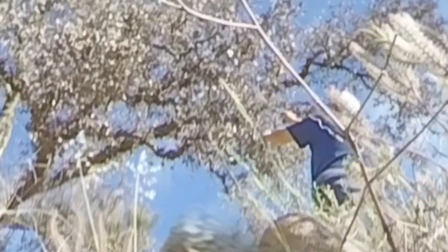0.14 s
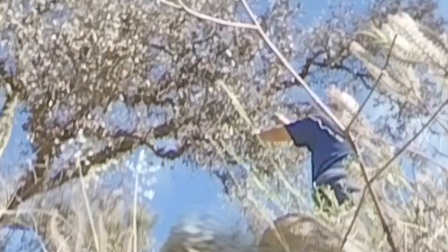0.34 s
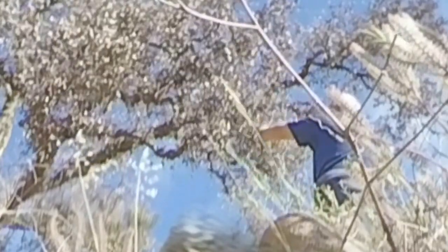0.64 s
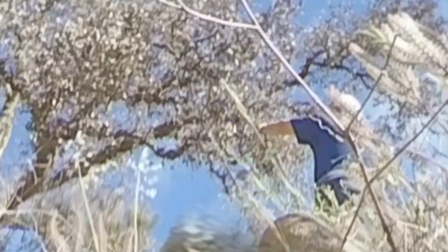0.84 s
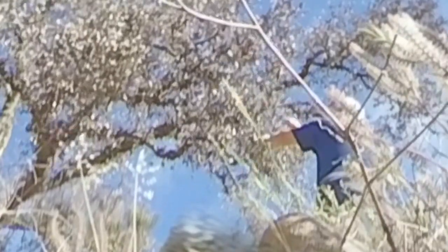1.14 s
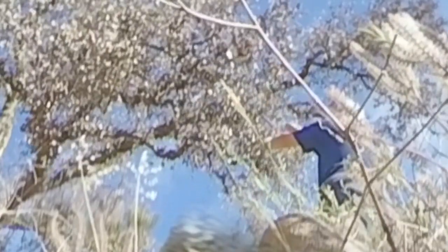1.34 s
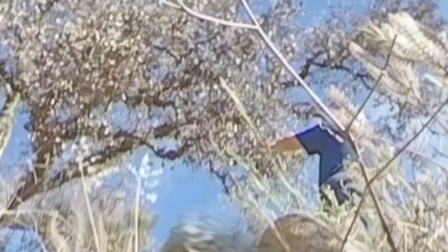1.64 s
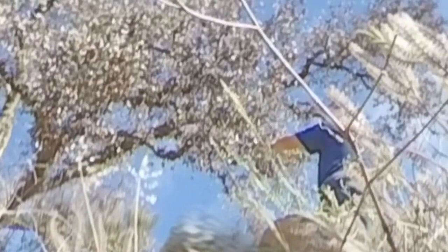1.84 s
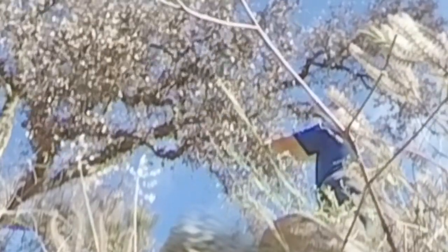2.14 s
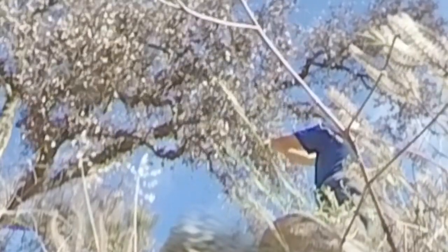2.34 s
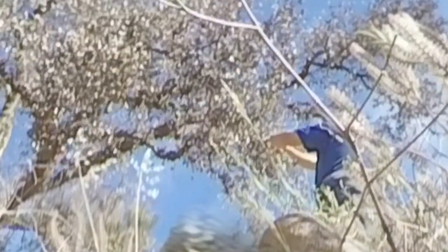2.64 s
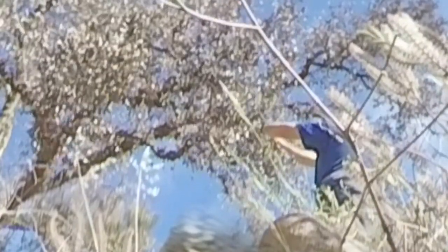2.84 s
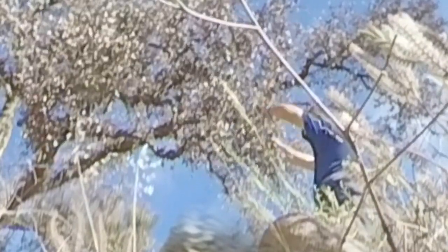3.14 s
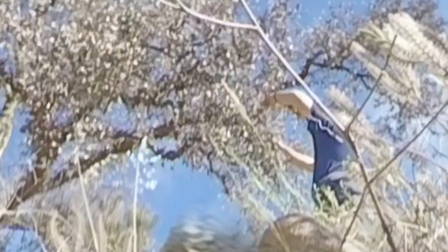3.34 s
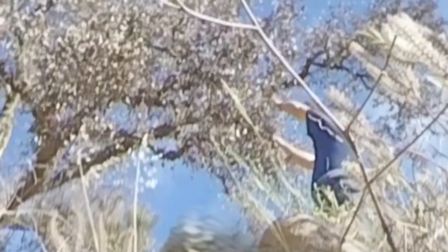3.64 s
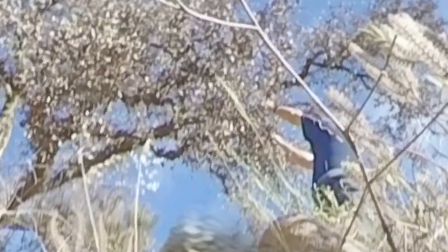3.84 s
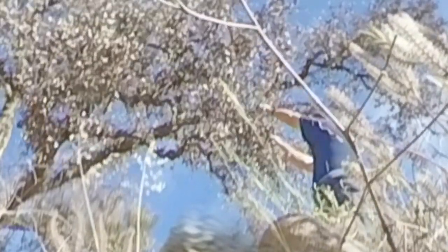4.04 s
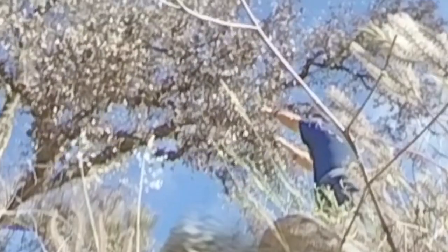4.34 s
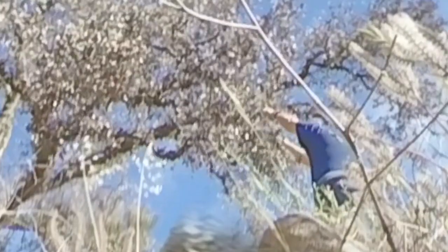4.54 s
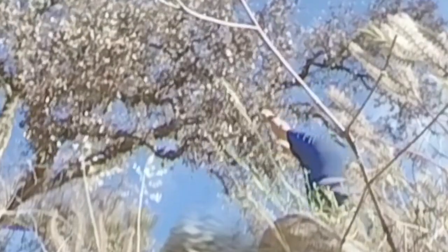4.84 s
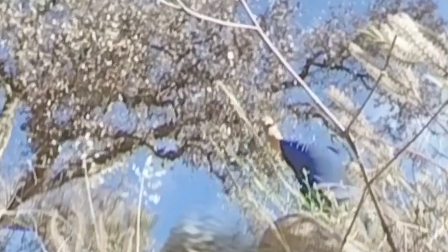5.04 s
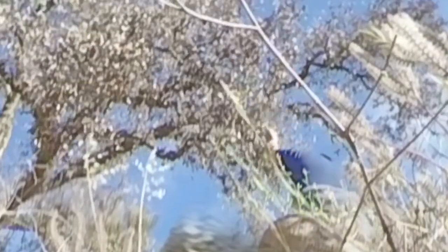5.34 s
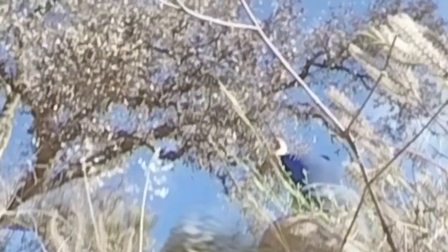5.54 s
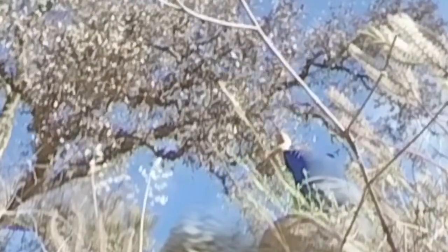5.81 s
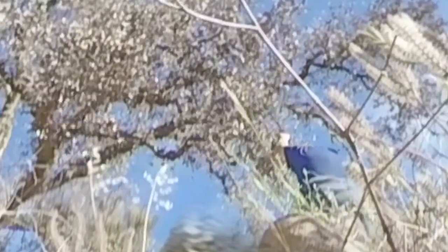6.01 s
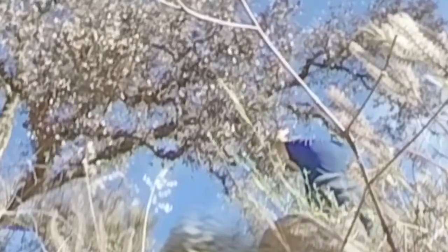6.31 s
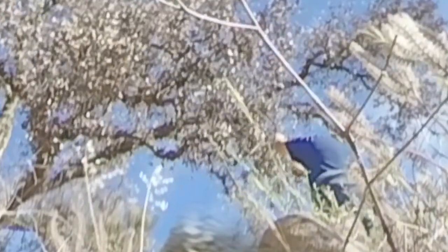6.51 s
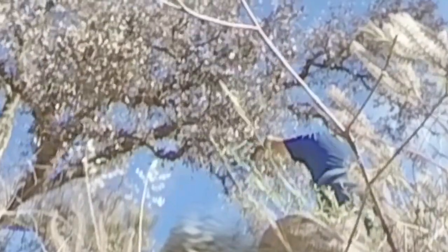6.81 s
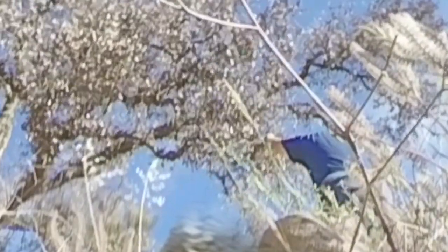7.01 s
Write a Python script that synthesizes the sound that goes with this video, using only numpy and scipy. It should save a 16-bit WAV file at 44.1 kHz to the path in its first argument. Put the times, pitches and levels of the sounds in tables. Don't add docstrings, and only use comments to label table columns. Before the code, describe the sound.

Bright, papery crackling of dry leaves and grass stems, broken by crisp twig snaps. It starts busy, drops to occasional rustles and single cracks, goes nearly still, then builds into a rapid run of loud splintering with dull low bumps, and settles to fine crackle. Open air, very little reverberation, a soft breeze hush; close small-camera microphone at ground level, with wide, slightly thin and unstable stereo.

```python
import sys
import numpy as np
from scipy import signal
from scipy.fft import rfft, irfft, next_fast_len
from scipy.io import wavfile
from scipy.ndimage import uniform_filter1d, map_coordinates

SR = 44100
rng = np.random.default_rng(int(sys.argv[2]) if len(sys.argv) > 2 else 0)


def gain_from_decibels(decibels):
    exponent = np.asarray(decibels, float) / 20
    return 10 ** exponent


def unload_wav(signal):
    wavfile.write(
        sys.argv[1],
        SR,
        np.round(np.clip(np.atleast_2d(signal).T, -1, 1) * 32767).astype(np.int16),
    )


N = 316197

# (from [s], to [s])
HOLES_LOW = [(0.038, 0.055), (0.134, 0.174), (0.229, 0.253), (0.293, 0.331), (0.946, 1.03),
             (1.205, 1.234), (1.663, 1.698), (1.811, 1.846), (2.058, 2.099), (2.31, 2.328), (2.36, 2.4),
             (2.705, 2.723), (2.754, 2.798), (3.103, 3.138), (4.177, 4.209), (4.45, 4.467),
             (4.566, 4.586), (4.775, 4.812), (5.03, 5.05), (5.352, 5.37), (5.468, 5.486), (5.564, 5.613),
             (5.634, 5.698), (5.793, 5.907), (5.965, 6.008), (6.031, 6.066), (6.165, 6.188),
             (6.217, 6.252), (6.31, 6.348), (6.49, 6.507), (6.632, 6.65), (6.76, 6.786)]
# (from [s], to [s])
HOLES_UNDER = [(0.015, 0.125), (0.18, 0.218), (0.25, 0.331), (0.479, 0.514), (0.758, 0.827),
               (0.842, 1.025), (1.057, 1.123), (1.515, 1.573), (1.593, 1.617), (1.666, 1.698),
               (1.782, 1.86), (2.038, 2.072), (2.389, 2.421), (2.482, 2.514), (3.547, 3.564),
               (3.683, 3.718), (4.731, 4.812), (4.911, 4.949), (5.021, 5.045), (5.346, 5.407),
               (5.419, 5.442), (5.468, 5.579), (5.611, 5.718), (5.793, 5.811), (5.843, 5.88),
               (5.915, 6.066), (6.104, 6.139), (6.313, 6.348), (6.635, 6.673)]
# (from [s], to [s])
HOLES_MIDDLE = [(0.017, 0.055), (0.177, 0.351), (0.476, 0.514), (0.711, 0.824), (0.842, 1.027),
                (1.181, 1.236), (1.411, 1.443), (1.518, 1.538), (1.782, 1.86), (1.945, 1.977),
                (2.052, 2.093), (2.249, 2.29), (2.302, 2.351), (2.386, 2.421), (2.548, 2.63),
                (2.804, 2.885), (3.007, 3.094), (3.341, 3.396), (3.68, 3.788), (4.264, 4.322),
                (4.731, 4.789), (4.902, 4.949), (5.018, 5.05), (5.076, 5.097), (5.338, 5.402),
                (5.526, 5.671), (5.756, 5.79), (5.889, 6.113), (6.194, 6.275), (6.4, 6.603),
                (6.635, 6.67), (6.931, 6.975)]
# (from [s], to [s])
HOLES_OVER = [(0.038, 0.055), (0.09, 0.122), (0.206, 0.328), (0.711, 0.772), (0.839, 1.025),
              (1.994, 2.055), (2.27, 2.287), (2.299, 2.328), (2.757, 2.815), (3.036, 3.068),
              (3.341, 3.396), (3.68, 3.744), (4.569, 4.6), (5.027, 5.045), (5.352, 5.396), (5.637, 5.692),
              (5.77, 5.793), (5.822, 5.88), (5.988, 6.063), (6.307, 6.33), (6.356, 6.412)]
# (from [Hz], to [Hz], spells of (from [s], to [s]))
HOLES = [(2584, 2842, HOLES_LOW), (4220, 4651, HOLES_UNDER), (4651, 5168, HOLES_MIDDLE),
         (5168, 5685, HOLES_OVER), (3101, 3445, [(.92, .94), (5.47, 5.49), (5.54, 5.56), (5.99, 6.02),
         (6.57, 6.63)]), (6287, 6890, [(.21, .26), (.72, .75), (5.87, 5.91)]), (7579, 8268, [(2.31, 2.35),
         (2.385, 2.42)]), (10335, 11024, [(.57, .6), (.76, .79), (.97, 1.03), (2.39, 2.42), (3.05, 3.09),
         (4.8, 4.84), (5.345, 5.365), (5.55, 5.69)]), (11024, 11713, [(.845, .885), (2.27, 2.29),
         (2.33, 2.42), (5.1, 5.13), (5.345, 5.365)])]
EDGE_S = .005


def unit(x):
    return x / np.sqrt(np.mean(x ** 2) + 1e-20)


def along(points, hz):
    f, v = np.transpose(points)
    return np.interp(np.log(hz + 1), np.log(f + 1), v)


def filtered(x, response):
    m = next_fast_len(N + 8192)
    return irfft(rfft(x, m) * response(np.fft.rfftfreq(m, 1 / SR)), m)[..., :N]


def wobble(rate):
    knots = rng.standard_normal(int(N * rate / SR) + 4)
    return map_coordinates(knots, [np.arange(N) * rate / SR])


def hush():
    # (frequency [Hz], density [dB per Hz])
    hush_colour = [(18, -31), (30, -10), (107, 0.5), (224, -8.5), (400, -5.5), (535, -7.5), (594, -6.5),
                   (734, -8), (4550, -10.5), (9280, -17.5), (13400, -13.5), (15300, -32), (16600, -74)]
    # (frequency [Hz], correlation [-1..1])
    likeness = [(60, 0.81), (300, 0.64), (700, 0.26), (1500, -0.085), (3500, -0.14), (4900, -0.067),
                (7000, 0.49), (15000, .3)]
    turn = lambda hz: np.arccos(np.clip(along(likeness, hz), -1, 1)) / 2
    colour = lambda hz: gain_from_decibels(along(hush_colour, hz)) * [np.cos(turn(hz)), np.sin(turn(hz))]
    mid, side = filtered(rng.standard_normal((2, N)), colour)
    air = gain_from_decibels(-54.5) * unit(np.array([mid + side, mid - side]))
    swell_db = -1.5 - 1.16 * wobble(2.47)
    bass = filtered(air, lambda hz: 1 / (1 + (hz / 300) ** 4))
    return air + bass * (gain_from_decibels(swell_db) - 1)


def stir():
    # (time [s], crackle level [dB])
    restlessness = [(0, -53), (.35, -54), (.62, -62), (1.4, -55.5), (1.9, -59), (2.25, -57), (2.7, -53.5),
                    (3.2, -58), (3.5, -68), (4.0, -61), (4.5, -56.5), (4.8, -47.5), (4.98, -53),
                    (5.29, -58), (5.75, -44), (5.95, -45), (6.6, -51), (7.17, -56.5)]
    # (time [s], crackle level [dB], hold [s], fade [dB per s], extra stalk level [dB])
    pulls = [(0.17, -44, 0.062, 69, -2.5), (0.468, -48, 0.024, 73, -3), (0.696, -34, 0.047, 46.5, 1.5),
             (0.753, -35, 0.018, 250, -2), (0.028, -44, 0.006, 154, -8), (1.506, -46, .015, 34, 1.5),
             (1.763, -48, 0.012, 36.5, 2), (2.304, -36.5, 0.016, 97, -1.5), (2.683, -52.5, 0.026, 60, -2),
             (2.987, -50.5, .03, 66, 4.5), (3.231, -44, 0.0074, 90, 0), (3.558, -53, 0.073, 510, 6),
             (3.67, -39, 0.0066, 218, 3.5), (3.713, -49.5, 0.013, 77, 0), (5.008, -43, 0.0086, 68, 4.5),
             (5.332, -36.5, 0.02, 118, 4), (5.42, -41.5, .03, 100, 4), (4.892, -49.5, .008, 130, 6),
             (.66, -46, 0.022, 100, 4), (5.47, -32.5, 0.011, 77, 3), (5.557, -32, 0.096, 143, 3),
             (6.145, -38, 0.015, 160, -4), (6.294, -45.5, 0.0096, 194.5, 7), (6.631, -43, 0.016, 113, -1),
             (.768, -33, .012, 700, 0), (5.662, -35, .008, 500, 0), (3.234, -43, .006, 600, 0),
             (4.62, -50, .015, 200, 0), (4.775, -46, .01, 200, 0), (5.066, -47, .01, 150, 3),
             (3.938, -52, .006, 400, 0), (4.37, -55, .02, 200, 0), (4.57, -52, .01, 300, 0),
             (2.755, -50, .008, 300, 0), (2.353, -41, .007, 400, 0), (6.025, -44, .02, 200, 2),
             (4.895, -37, .002, 900, -4)]
    rise_db_per_s = 3000
    t = np.arange(0, N, 32) / SR
    fizz = gain_from_decibels(2 * np.interp(t, *np.transpose(restlessness)))
    stalks = fizz.copy()
    for s, db, hold, fade, extra_db in pulls:
        rising = rise_db_per_s * np.maximum(s - t, 0)
        fading = abs(fade) * np.maximum(t - s - hold, 0)
        power = gain_from_decibels(2 * (db - rising - fading))
        fizz = fizz + power
        stalks = stalks + power * gain_from_decibels(2 * extra_db)
    fizz_db = 10 * np.log10(fizz)
    stalk_db = -61 + 0.83 * (fizz_db + 50.5) + 10 * np.log10(stalks / fizz)
    return [np.interp(np.arange(N) / SR, t, db) for db in (fizz_db, stalk_db)]


def grains(count, top_hz, life_s, spread_db, size=48):
    when = rng.random(count)
    strength = np.minimum(rng.exponential(size=count), 3.5)
    life = life_s * np.exp(.5 * rng.standard_normal(count))
    t = np.arange(size) / SR
    fade = gain_from_decibels(spread_db * strength)[:, None] * np.exp(-t / life[:, None])
    index = ((when * N).astype(int)[:, None] + np.arange(size)).ravel()
    showers = []
    for _ in range(2):
        ring = np.sin(2 * np.pi * (top_hz * rng.random((count, 1)) * t + rng.random((count, 1))))
        showers.append(np.bincount(index, (fade * ring).ravel(), N + size)[:N])
    return unit(np.array(showers))


def patchy(pair, depth_db, size):
    z = signal.stft(pair, nperseg=512)[2]
    field = uniform_filter1d(rng.standard_normal(z.shape), size=size, axis=1)
    field = uniform_filter1d(field, size=9, axis=2)
    return signal.istft(z * gain_from_decibels(depth_db * unit(field)), nperseg=512)[1][:, :N]


def crackle():
    fizz_db, stalk_db = stir()
    clumps_db = 1.26 * wobble(25) + .9 * wobble(90) + 1.2 * wobble(500)
    fizz = grains(count=16000, top_hz=16820, life_s=0.00042, spread_db=1.5)
    fizz = fizz + 1.4 * rng.standard_normal((2, N))
    stalk = grains(count=5000, top_hz=5060, life_s=0.0011, spread_db=1.0)
    stalk = stalk + 2.3 * rng.standard_normal((2, N))
    fizz = gain_from_decibels(fizz_db + clumps_db) * unit(patchy(fizz, depth_db=4, size=4))
    stalk = gain_from_decibels(stalk_db - 2.5 + 0.073 * clumps_db) * unit(patchy(stalk, depth_db=4.5, size=2))
    return fizz, stalk


def snaps():
    # (time [s], peak [dB], wood knock [dB], share under 7 kHz [dB])
    twigs = [(.151, -30, -33, 1.5), (.653, -14.5, -15.5, -33), (0.693, -29, -14, -15), (.758, -28, -25, -2),
             (.771, -20, -23, -24), (0.8298, -15.5, -35, -34), (1.5134, -21, -15, -23),
             (1.6245, -25.5, -36, -13), (1.773, -36.5, -8, 3), (2.2977, -25, -7, -29),
             (2.3426, -22.5, -24, -27), (2.3522, -28, -7, -9), (3.587, -30.5, -12, -3),
             (3.6204, -24, -29, -6.5), (3.6714, -18.5, -40, -7), (4.892, -11, -32, -32),
             (5.066, -30, -17, -4.5), (5.258, -25, -24, -31), (5.32, -11.5, -24, -1.5),
             (5.3367, -11, -33, -14.5), (5.353, -24, -10, -14), (5.411, -19.5, -31, -29),
             (5.4586, -10.5, -4, -4), (5.6295, -24, -21, -18), (5.6195, -22, -16, -22),
             (5.643, -31, -20, -18.5), (5.666, -19, -30, -28), (5.6813, -25, -18, -18),
             (6.148, -27, -21, -27), (6.1764, -27, -18, -31)]
    # (time [s], peak [dB], thickness [dB])
    cracking_stalks = [(.043, -26.5, 2), (0.187, -26, 3), (0.305, -30.5, 5), (0.4547, -25.5, 2.5),
                       (0.708, -31, -3), (.79, -29, 3), (1.109, -24, -12), (1.5233, -23.5, -6),
                       (1.6574, -32, -6), (1.8292, -31, -5), (1.9206, -31.5, 7), (2.2079, -27.5, -6),
                       (2.3038, -33, -5), (2.7082, -38, 8), (2.7274, -31, 7), (.1283, -31.5, .3),
                       (3.0785, -32, 6), (3.2348, -31, 3), (4.628, -32, 4), (4.772, -34, 10.5),
                       (5.034, -34, 0), (5.561, -27, 8), (5.699, -30, -5), (0.7198, -31, 3),
                       (5.9824, -34, -1), (6.033, -33, 6), (6.2939, -28, 9), (6.425, -30, 5),
                       (6.6217, -29, -7), (6.7985, -34, 10.5)]
    # (time [s], peak [dB])
    further_breaks = [(3.002, -29.5), (.277, -37), (0.429, -33.5), (.5825, -36), (0.671, -35), (5.7933, -24),
                      (.954, -28), (1.162, -38), (1.369, -39), (1.6023, -34), (2.0187, -38), (2.0531, -35),
                      (2.0737, -37), (2.149, -39), (2.3704, -35), (2.4209, -34), (2.7574, -39), (2.8736, -39),
                      (3.6658, -25), (3.577, -32), (3.9233, -34.5), (4.252, -40), (4.3673, -43), (4.4634, -35),
                      (4.73, -40), (5.0105, -25), (4.867, -33.5), (6.6373, -43), (6.8888, -37), (7.1462, -41),
                      (.837, -27), (.8015, -30), (.814, -30.5), (2.3005, -25.5), (2.307, -24), (2.357, -26),
                      (2.383, -31), (3.677, -29), (3.626, -35), (3.64, -38), (5.363, -30), (5.466, -28),
                      (5.484, -26), (5.571, -27), (5.593, -22), (5.608, -26), (5.667, -26), (5.802, -32),
                      (0.777, -27), (.879, -31), (.4125, -37), (.3915, -40), (2.6813, -38), (3.94, -40),
                      (4.4174, -39), (4.6828, -38), (5.898, -34), (6.558, -36), (7.1317, -40), (.0368, -32)]
    common_knock_db, common_low_db = -17.5, -21.5
    clean_t60_s, tearing_t60_s, splinter_t60_s = 0.0054, 0.029, 0.038
    bounce, bounce_s = .6, .0004

    breaks = [(*twig, clean_t60_s) for twig in twigs]
    breaks += [(s, db, common_knock_db, common_low_db, clean_t60_s) for s, db in further_breaks]
    for s, db, thick in cracking_stalks:
        breaks.append((s, db - 5, common_knock_db + thick, common_low_db + thick, tearing_t60_s))

    t = np.arange(SR // 16) / SR
    layers = np.zeros((3, 2, N + len(t)))
    rise = 1 - np.exp(-t / .0005)
    for s, db, knock_db, low_db, t60 in breaks:
        splintering = gain_from_decibels(-17.5 - 60 * t / splinter_t60_s) + gain_from_decibels(-23.5 - 60 * t / 0.14)
        shape = rise * (gain_from_decibels(3.5 - 60 * t / t60) + splintering)
        levels = gain_from_decibels(db + np.array([2.5, low_db + 10, knock_db + 7.0]))
        burst = rng.standard_normal((3, 2, len(t))) * shape
        burst[:2, :, round(.0006 * SR)] += 2 * np.sign(burst[:2, :, 9])
        burst += bounce * np.roll(burst, 2 + int(rng.random() * bounce_s * SR), axis=2)
        burst[2] *= gain_from_decibels(0.42 * np.minimum(60 * t / t60, 15))
        burst /= abs(burst).max(axis=2, keepdims=True)
        layers[..., round(s * SR):][..., :len(t)] += levels[:, None, None] * burst
    high, low, knock = layers[..., :N]
    lowpass = signal.butter(2, 7000, fs=SR, output="sos")
    return high + signal.sosfilt(lowpass, low - high), knock


def thuds():
    # (time [s], peak [dB], ring [Hz], low push [dB])
    contacts = [(0.146, -67, 695, -73), (0.712, -49, 540, -72), (1.333, -57, 377, -68),
                (1.483, -50, 655, -69), (1.717, -49, 670, -69), (4.199, -67, 767, -58),
                (4.468, -50, 540, -61), (4.727, -50, 648, -55), (4.804, -49, 368, -65),
                (4.889, -56, 587, -48.5), (5.318, -49, 564, -55), (5.36, -47.5, 283, -50),
                (5.458, -45, 783, -73), (5.519, -50.5, 320, -61), (5.557, -47.5, 626, -65),
                (5.629, -45, 714, -59), (5.775, -50, 377, -54), (6.072, -45.5, 378, -54),
                (.652, -52, 930, -75), (0.774, -49, 1160, -77), (.81, -53, 1215, -75),
                (1.331, -50, 1000, -75), (1.496, -47, 1115, -75)]
    out = np.zeros(N + SR)
    t = np.arange(SR // 8) / SR
    rise = 1 - np.exp(-t / 0.0029)
    for s, db, hz, push_db in contacts:
        wander = np.cumsum(rng.standard_normal(len(t))) * 0.14
        ring = gain_from_decibels(db + 4.5 - 60 * t / 0.06) * np.sin(2 * np.pi * hz * t + wander)
        push = gain_from_decibels(push_db - 60 * t / 0.18) * np.sin(2 * np.pi * 95 * t + wander)
        out[round(s * SR):][:len(t)] += rise * (ring + push)
    return out[:N]


def thicket(x, wet_db):
    # (frequency [Hz], t60 [s])
    scatter = [(500, 0.038), (3000, 0.16), (15000, 0.023)]
    hz, t, z = signal.stft(rng.standard_normal((2, SR // 6)), SR, nperseg=256)
    fade = gain_from_decibels(-60 * t / along(scatter, hz)[:, None])
    tail = signal.istft(z * fade, SR, nperseg=256)[1]
    return x + gain_from_decibels(wet_db) * signal.fftconvolve(x, tail / np.linalg.norm(tail[0]), axes=1)[:, :N]


def ports(pair, mid_colour, side_colour, side_db):
    lag_s, direct = .0001, .6

    def gain(hz):
        colours = gain_from_decibels([along(mid_colour, hz), along(side_colour, hz) + side_db])
        return colours / (1 + (500 / (hz + 1)) ** 4)

    tied = lambda hz: direct * np.sin(2 * np.pi * hz * lag_s)
    late = filtered(pair, lambda hz: np.array([-1j * tied(hz), np.sqrt(1 - tied(hz) ** 2)])).sum(axis=0)
    mid_rms = np.sqrt(np.mean(gain(np.linspace(0, SR / 2, 999))[0] ** 2))
    mid, side = filtered(np.array([pair[0], late]), gain) / mid_rms
    return np.array([mid + side, mid - side])


def scene():
    # (frequency [Hz], density [dB per Hz])
    bright_sum = [(1200, -21.5), (2400, -12.5), (3200, -21), (3850, -8), (4300, -17), (5200, -13),
                  (5800, -8.5), (7300, -9.5), (9500, -7.5), (11000, -3), (14200, -6), (15200, 1),
                  (15800, -4), (16600, -32)]
    # (frequency [Hz], density [dB per Hz])
    bright_difference = [(1200, -26.5), (2600, -13), (3100, -17), (4100, -11), (4900, -4.5), (6300, -9),
                         (7300, -10), (8800, -8), (10300, -9.5), (11500, -8.5), (13500, -7), (15300, -7),
                         (15900, -14), (16600, -20)]
    # (frequency [Hz], density [dB per Hz])
    stalk_colour = [(150, -75), (400, 6), (700, -4.5), (1200, 2), (1800, 3), (2500, 2), (3300, 2),
                    (5000, -1)]
    fizz, stalk = crackle()
    splinters, knock = snaps()
    scattered = thicket(fizz + splinters, wet_db=-14)
    bright = ports(scattered, bright_sum, bright_difference, side_db=0.23)
    dull = ports(stalk + knock, stalk_colour, stalk_colour, side_db=-2.5)
    return bright + dull + thuds() + hush()


def during(spells):
    t = np.arange(N) / SR
    widened = spells + np.array([-EDGE_S, EDGE_S])
    inside = 1. * (np.searchsorted(np.ravel(widened), t) % 2)
    width = round(EDGE_S * SR)
    return uniform_filter1d(uniform_filter1d(inside, size=width), size=width)


def with_holes(mid):
    # (from [s], to [s])
    hole_spells = [(.638, .648), (1.497, 1.507), (2.285, 2.296), (2.985, 2.998), (3.61, 3.617),
                   (3.648, 3.663), (5.305, 5.316), (5.326, 5.334), (5.345, 5.352), (5.396, 5.408),
                   (5.42, 5.454), (5.772, 5.79)]
    bands = filtered(mid, lambda hz: np.array([(hz > low) & (hz <= high) for low, high, _ in HOLES]))
    mid = mid - sum(during(spells) * band for (*_, spells), band in zip(HOLES, bands))
    hz, t, z = signal.stft(mid, SR, window="cosine", nperseg=256)
    patches = rng.random((z.shape[0] // 8 + 1, z.shape[1] // 2 + 1)) < .22
    lost = np.kron(patches, np.ones((8, 2)))[:z.shape[0], :z.shape[1]]
    lost = lost * (hz > 2700)[:, None] * (np.searchsorted(np.ravel(hole_spells), t) % 2)
    return signal.istft(z * (1 - lost), SR, window="cosine", nperseg=256)[1][:N]


def thinned_stereo(x, waver_db, attack_db):
    # (frequency [Hz], margin [dB])
    lose_sum = [(2000, 30), (3000, 10), (5700, 14), (8000, 8), (11000, 4), (15000, 9)]
    # (frequency [Hz], margin [dB])
    lose_difference = [(2000, 30), (3200, 7), (5500, 7.7), (7500, 1.5), (8900, 6), (10800, 3), (13500, 7.5),
                       (15500, 3.4)]
    band_edges = [0, 2326, 2584, 2842, 3101, 3445, 3790, 4220, 4651, 5168, 5685, 6287]
    steady_top_hz, top_open_s, dropout_s = 15760, .02, 3.66

    hz, t, z = signal.stft([x[0] + x[1], x[0] - x[1]], SR, window="cosine", nperseg=2048)
    edges = np.searchsorted(hz, np.r_[band_edges, 6890:22000:689])
    centre = hz[edges] + np.diff(hz[edges], append=22500) / 2
    power = np.add.reduceat(abs(z) ** 2, edges, axis=1) + 1e-20
    waver = uniform_filter1d(rng.standard_normal(power.shape[1:]), size=3, axis=1)
    gap_db = 10 * np.log10(power[0] / power[1]) + waver_db * unit(waver)
    gap_db += 4.5 * np.exp(-((centre - 4850) / 1000) ** 2)[:, None]
    for low_hz, high_hz, spells in HOLES:
        spell = np.searchsorted(np.ravel(spells), t) % 2
        gap_db[np.ix_((centre > low_hz) & (centre < high_hz), spell > 0)] = 0
    keep_sum = -gap_db < along(lose_sum, hz[edges])[:, None]
    keep_difference = gap_db < along(lose_difference, hz[edges])[:, None]
    band_of_bin = np.searchsorted(edges, np.arange(len(hz)), side="right") - 1
    keep = np.array([keep_sum, keep_difference])[:, band_of_bin]

    loud_db = 10 * np.log10(np.add.reduceat(np.sum(x ** 2, axis=0), np.arange(0, N, 128)) + 1e-20)
    attacks = np.flatnonzero(loud_db[2:] - loud_db[:-2] > attack_db) + 2
    keep |= np.isin(np.arange(z.shape[2]), np.r_[attacks // 8, attacks // 8 + 1])
    pair = signal.istft(z * keep, SR, window="cosine", nperseg=2048)[1][:, :N] / 2

    marks = 1. * np.bincount(np.minimum(attacks * 128 + 200, N - 1), minlength=N)
    opened = uniform_filter1d(marks, size=round(top_open_s * SR)) * top_open_s * SR
    shut = 1 - uniform_filter1d(np.minimum(opened, 1), size=round(EDGE_S * SR))
    mid, side = pair - shut * filtered(pair, lambda hz: hz > steady_top_hz)
    mid = with_holes(mid)
    dropout = np.clip(abs(np.arange(N) / SR - dropout_s) / .001 - 1, .03, 1)
    return dropout * np.array([mid + side, mid - side])


def roll_off(x):
    return signal.sosfilt(signal.butter(12, 17110, fs=SR, output="sos"), x)


def record(dry):
    # (frequency [Hz], level [dB])
    port_lean = [(60, -4), (200, -1), (700, -.4), (1300, -3), (2400, -1.5), (4400, -1), (8100, 1.5),
                 (15000, 2)]
    tilt = lambda hz: gain_from_decibels(np.outer([.5, -.5], along(port_lean, hz))) * (hz < 17000)
    mix = thinned_stereo(filtered(dry, tilt), waver_db=3.0, attack_db=14.5)
    return roll_off(mix)


dry = scene()
out = record(dry)
unload_wav(out)
```